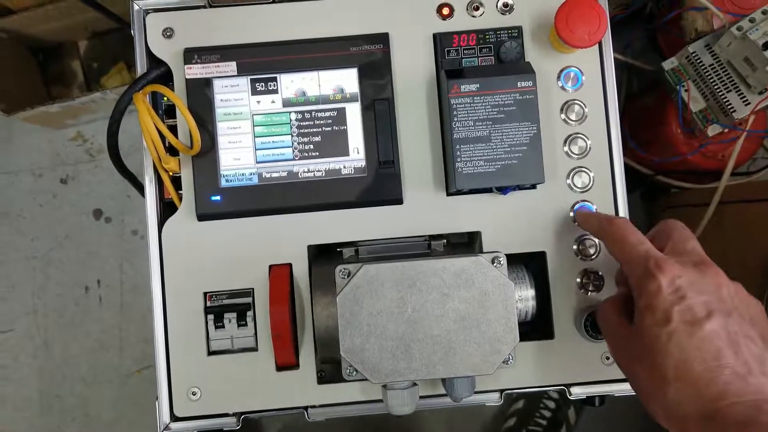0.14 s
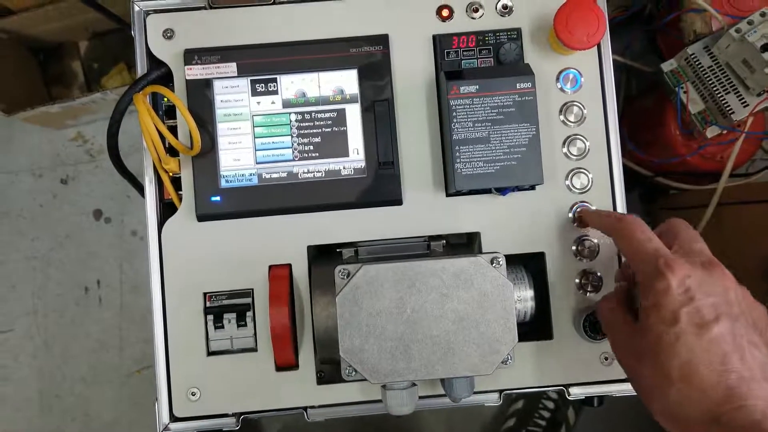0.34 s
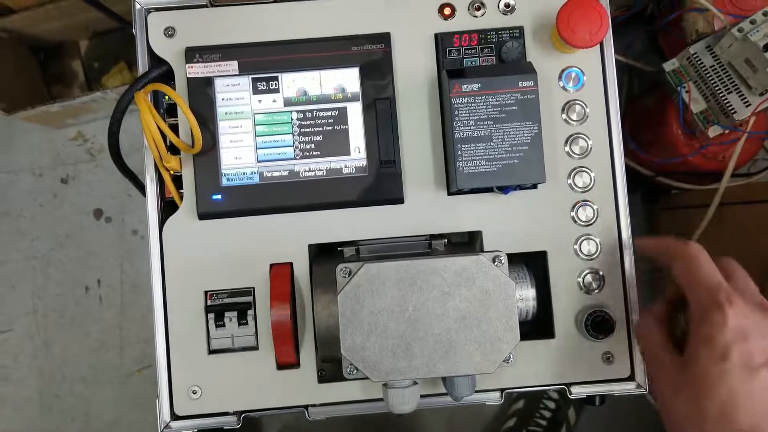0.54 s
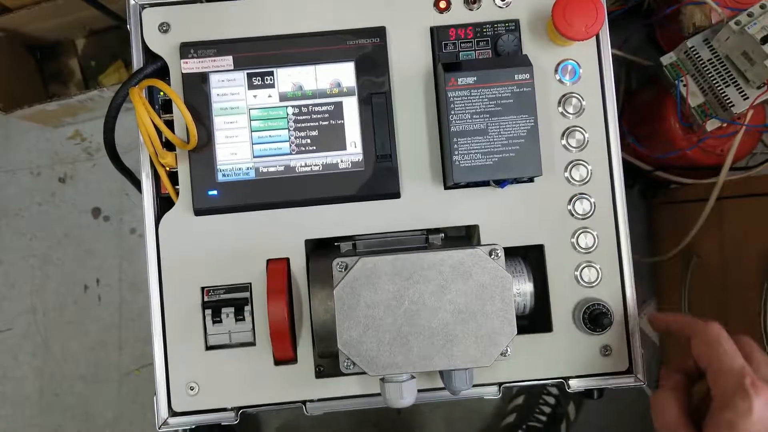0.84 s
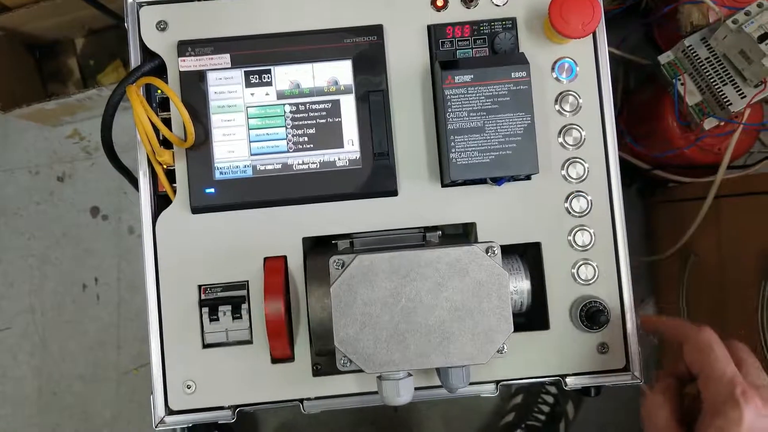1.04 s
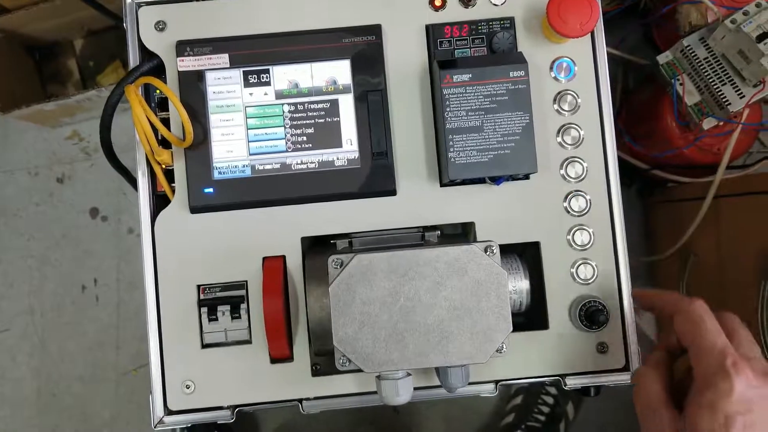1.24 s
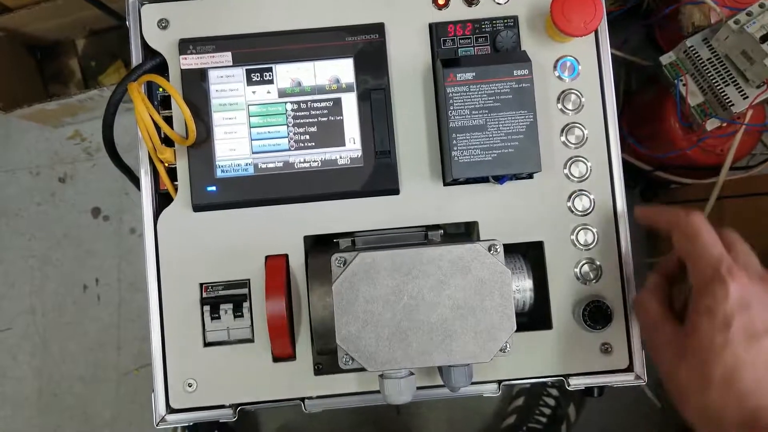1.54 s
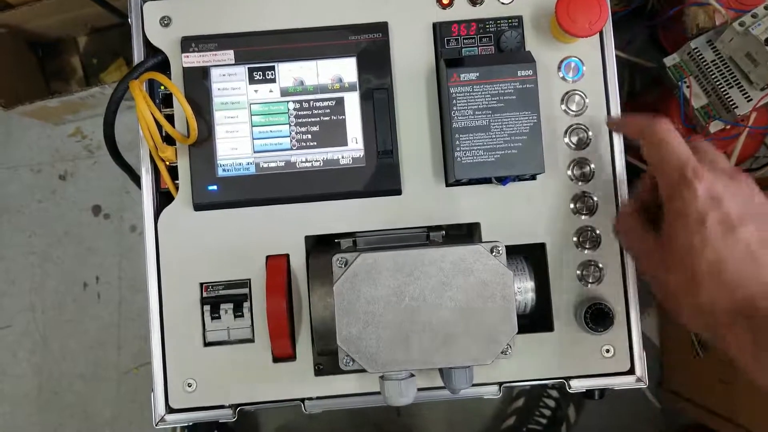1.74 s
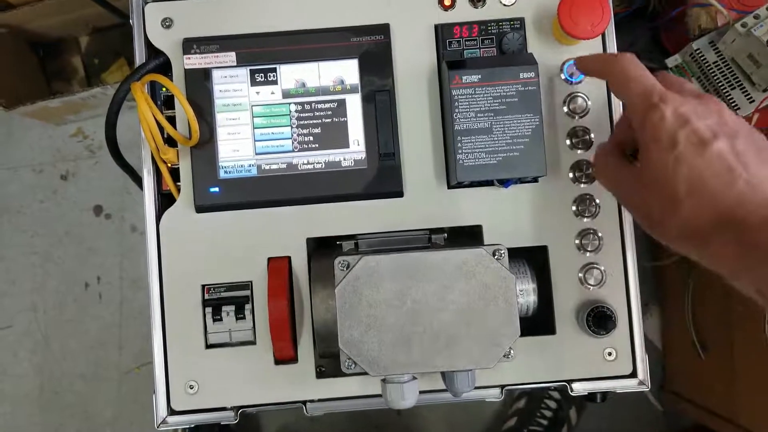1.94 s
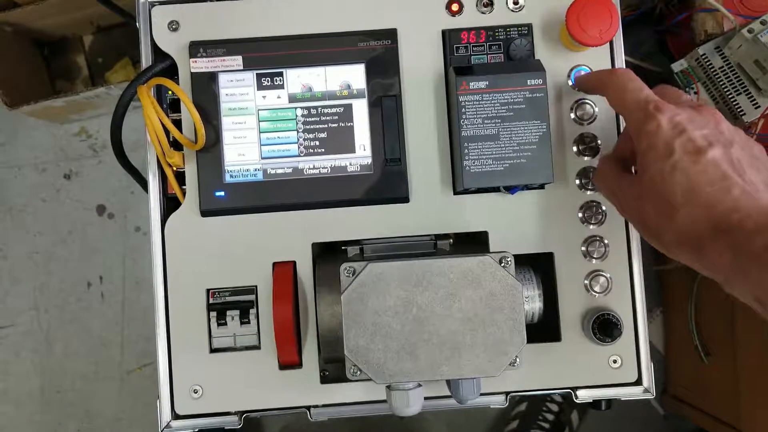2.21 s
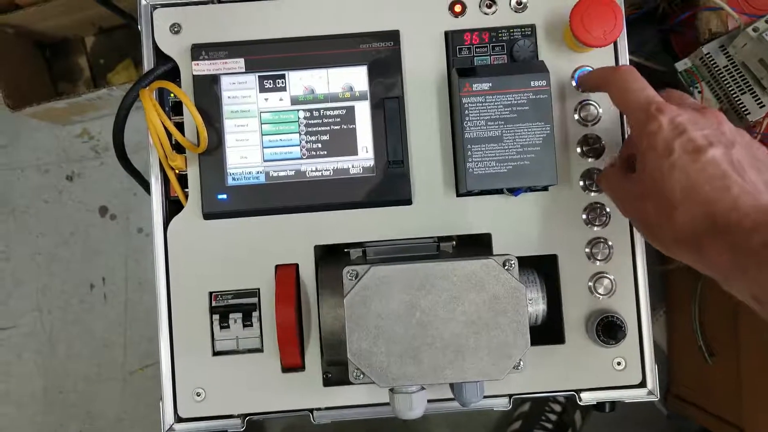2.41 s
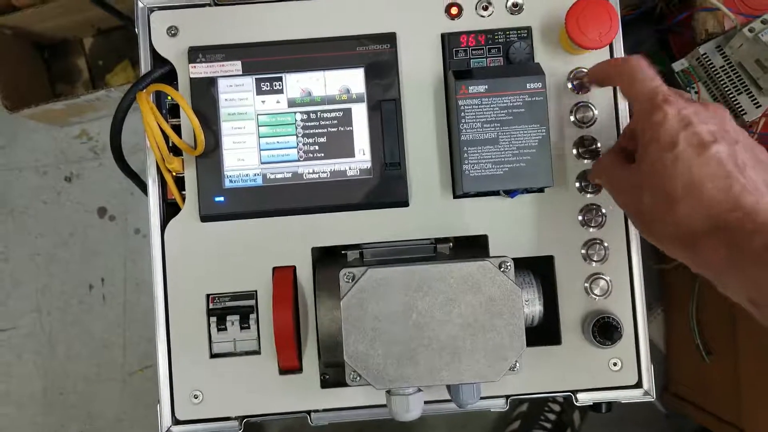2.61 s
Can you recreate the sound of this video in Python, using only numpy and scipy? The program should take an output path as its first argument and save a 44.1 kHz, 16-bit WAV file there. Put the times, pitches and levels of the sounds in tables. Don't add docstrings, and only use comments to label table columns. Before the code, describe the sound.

A small electric motor squeaks faintly while barely turning, then a button clicks, the hollow case thumps twice and the motor whines shrilly with fast rhythmic squeals until another click cuts it; close handheld phone, quiet room.

```python
import sys
import numpy as np
from scipy import signal
from scipy.fft import rfft, irfft
from scipy.io import wavfile
from scipy.ndimage import uniform_filter1d

SR = 44100
rng = np.random.default_rng(int(sys.argv[2]) if len(sys.argv) > 2 else 0)


def wav_record(signal):
    frames = np.transpose(np.atleast_2d(signal))
    bounded = np.clip(frames, -1, 1)
    quanta = np.round(bounded * 32767).astype(np.int16)
    wavfile.write(sys.argv[1], SR, quanta)


def natural_amplitude(level_db):
    exponent = np.asarray(level_db, float) / 20
    return 10 ** exponent


N = 123480
SHAFT_HZ = 16.02
ON_S, OFF_S, COAST_S = 0.222, 2.505, 0.03
FLICKER_DB = 1.5
PORTS = np.array([[1], [-1]])


def table(rows, hz):
    r = np.array(rows, float)
    return np.interp(np.log(hz + 1), np.log(r[:, 0]), r[:, 1])


def walk(rate):
    k = int(SR / rate)
    steps = np.repeat(rng.standard_normal(N // k + 1), k)
    return 1.53 * uniform_filter1d(uniform_filter1d(steps, k), k)[:N]


def swell(x, width):
    return np.exp(-.5 * (x / width) ** 2)


def pan(db):
    return natural_amplitude(PORTS * db / 2)


# f/Hz, level/dB
BALANCE = [(60, 4), (380, -11), (1500, -3), (4400, -10.5), (9000, -6.5), (15000, 4)]
# f/Hz, likeness (0 to 1)
LIKENESS_OF_PORTS = [(60, 0.81), (300, 0.8), (1200, 0.49), (3000, 0.2), (8000, 0.085), (16000, 0.039)]


def stereo(db_of):
    hz = np.arange(N // 2 + 1) * SR / N
    noise = rng.standard_normal((2, N))
    mid, side = rfft(noise)
    alike = np.clip(table(LIKENESS_OF_PORTS, hz), 0, 1)
    mixed = np.sqrt(1 + alike) * mid + PORTS * np.sqrt(1 - alike) * side
    out = irfft(mixed * natural_amplitude(db_of(hz)) * pan(table(BALANCE, hz)), N)
    return out / np.sqrt(np.sum(out ** 2) / np.sum(noise ** 2))


def tone(phase, pan_db, lead):
    return np.sqrt(2) * pan(pan_db) * np.sin(phase + PORTS * lead / 2)


# place in multiples of the drive frequency, level/dB, left-right/dB
SIDEBANDS = [(-13, -75, 6), (-11, -76, -3), (-7, -68, 2), (-5, -55, 10), (-1, -55, 4), (1, -52, 10),
             (5, -56, 4), (7, -69, 8), (11, -68, 3), (13, -68, 14), (17, -65, 10), (19, -67, 13),
             (23, -68, 3), (25, -72, 5), (29, -66, 7), (35, -72, 4)]
# f/Hz, level/dB
IDLE_LINES = [(9900, -84), (9970, -80), (9998, -74), (10099, -79)]
# t/s, level/dB
WHINE_NEARNESS = [(.3, -2), (.55, -2), (.62, 0), (1.1, 1), (1.25, -1), (1.75, 1), (1.95, -1.5), (2.2, -0.5),
                  (2.5, -4.5)]


def whine(t):
    carrier_hz, drive_hz = 10000.3, 32.41
    wander_db, wander_rad = 1.8, .5
    run = 0
    for multiple, db, pan_db in SIDEBANDS:
        hz = carrier_hz + round(multiple) * drive_hz
        level = natural_amplitude(db + wander_db * np.array([walk(5.4), walk(6.77)]))
        phase = 2 * np.pi * (hz * t + rng.random()) + wander_rad * walk(5.47)
        run = run + level * tone(phase, pan_db, -1.35 + 2 * wander_rad * walk(3.88))
    hum_phase = 2 * np.pi * 352.7 * t + 1.3 * walk(7.27)
    run = run + natural_amplitude(-64.5 + 1.6 * walk(10.55)) * tone(hum_phase, -8, -0.14)
    idle = 0
    for hz, db in IDLE_LINES:
        phase = 2 * np.pi * hz * t + 0.7 * walk(48)
        idle = idle + natural_amplitude(db + 1.1 * walk(30.7)) * tone(phase, 8.6, 0.88)
    rise_s, fall_s = 0.092, 0.0061
    on = np.clip((t - ON_S) / rise_s, 0, 1) * np.exp(-np.maximum(t - OFF_S, 0) / fall_s)
    near_db = np.interp(t, *np.array(WHINE_NEARNESS).T)
    return natural_amplitude(1.23 + near_db) * on * run + (1 - on) * idle


# f/Hz, peak level/dB, place in the turn, length in turns, glide share per turn
SQUEAL_PARTIALS = [(1193, -49, -0.015, 0.078, -0.077), (2455, -47, -0.012, 0.079, -0.122),
                   (2728, -51.5, -0.21, 0.086, -0.2256), (4832, -50.5, 0.065, 0.057, -0.011),
                   (5120, -54, 0.166, 0.017, 0.06), (6570, -52.5, -0.15, 0.11, -0.014),
                   (7270, -61, 0.051, 0.078, -0.062), (12170, -59, 0.087, 0.079, -0.026),
                   (3760, -64.5, -0.058, 0.14, -0.049), (5490, -65, -0.26, 0.086, 0.034)]
# left-right/dB, left leads/rad, roughness/rad
SQUEAL_PLACES = [(-1.5, 0.73, 0.57), (0.4, -1.44, 0.59), (1, -0.63, 1.37), (-11, -1.7, 0.59),
                 (-8.5, 1.5, 2.1), (4.5, 3, 0.76), (-12, -3, 0.5), (11, -0.6, 5.1), (-9.5, -2.5, 3.1),
                 (-8, 1, 3.5)]
# low hum level/dB, squeal level/dB, whistle level/dB, scrape level/dB
TURN_LEVELS = [(1, 0, 2, 3), (-4, 0.5, 1, 6), (0, 3.5, 1, 3.5), (-2.5, 6.5, -4, 2), (1, 5, -4, 2.5),
               (-2, 5, -2, 2), (-3, -2, 6.5, 2.5), (-1, 2, -8, -2), (-4, 1.5, 7.5, -0.5),
               (3.5, 3.5, 5.5, -4), (-4.5, 3, -4, 1.5), (-1.5, 0, 14, -2.5), (-0.5, 0, 0, -5),
               (4, -1, 1.5, 4), (1, -2.5, -4, -2), (3.5, 2.5, -7, 3.5), (-6, 5.5, -3, -6),
               (4.5, 5.5, -13, -8), (-0.5, 5, -1, -4), (-6, -12, 1, -5), (4, 0, 1, -0.5), (0.5, 3.5, 1, -2),
               (0.5, -23, 4, 1.5), (4, 1.5, -4, -6), (-2, 3.5, -7, -1), (0, -2.5, -2, -6),
               (2.5, -4, 5.5, -5), (-5, 3, -2, -1.5), (-4, -0.5, 6, 1.5), (3.5, 3, 2, 0.5),
               (1.5, -1.5, -4, -1.5), (3.5, -4.5, -5, -9), (1.5, 0, -3, 1), (-1, -11, 2, 4),
               (4, -11, 8.5, 2.5), (-1, -1.5, -7, -3), (-9, -4, 7.5, -2.5)]
PARTIAL_STRANDS = [(0, 1), (1, .55), (3, 1), (1, 1), (1, .7), (2, 1), (1, .5), (1, .4), (1, .4), (2, .5)]


def squeal(t):
    first_turn, last_turn_s = 5, 2.56
    jitter_turns, own_scatter_db = .012, 1
    turns = np.array(TURN_LEVELS, float)
    coast_db = np.maximum(t - last_turn_s, 0) / COAST_S * 20
    shared_jitter = rng.standard_normal(50)
    out = 0
    for partial, side, strand in zip(SQUEAL_PARTIALS, SQUEAL_PLACES, PARTIAL_STRANDS):
        hz, db, place, length, glide = partial
        pan_db, lead, rough = side
        column, share = strand
        turn = SHAFT_HZ * t - place + .5
        k = turn.astype(int)
        own_level, own_pitch, own_jitter = rng.standard_normal((3, 50))
        p = turn % 1 - .5 + jitter_turns * (shared_jitter[k] + own_jitter[k])
        shape = swell(p, length) + 0.24 * swell(p - 2 * length, 2 * length)
        turn_db = share * turns[np.clip(k - first_turn, 0, len(turns) - 1), int(column)]
        level_db = db + turn_db - coast_db + own_scatter_db * own_level[k] + FLICKER_DB * walk(250)
        pitch = hz * (1 + glide * p + 0.0037 * own_pitch[k])
        phase = 2 * np.pi * np.cumsum(pitch) / SR + rough * walk(200)
        out = out + shape * natural_amplitude(level_db) * tone(phase, pan_db, lead + 0.2 * rough * walk(60.3))
    return out * (t > ON_S + .05)


# f/Hz, level/dB per Hz
HISS_COLOUR = [(88, -47), (150, -15.5), (1190, -8), (4950, -16), (8400, -12.5), (10200, -3.5), (16000, -24)]
# f/Hz, width/Hz, level/dB
HOUSING_MODES = [(475.6, 116, 12.5), (208, 49, 10.5), (1180, 468, 14.5), (2627, 580, 9.5), (4820, 490, 2.5),
                 (6900, 1050, 5.5), (10000, 1700, -2), (12300, 1500, 5), (5900, 1100, 1.5)]


def hiss(t):
    def colour(hz):
        modes = sum(db / (1 + (2 * (hz - f) / width) ** 2) for f, width, db in HOUSING_MODES)
        return table(HISS_COLOUR, hz) + modes - 30 * (hz < 140)

    on = np.clip((t - ON_S) / 0.012, 0, 1) * np.exp(-np.maximum(t - OFF_S - .05, 0) / COAST_S)
    breath_db = 1.55 * np.cos(2 * np.pi * (SHAFT_HZ * t + 0.12))
    return natural_amplitude(-49.5 + breath_db + .8 * walk(24.89)) * on * stereo(colour)


# t/s, level/dB, push length/s, which ring
CASE_BLOWS = [(0.2424, -27, 0.00048, 0), (.244, -31.5, 0.00069, 0), (.247, -24, 0.00049, 0),
              (.251, -25.5, 0.00019, 0), (.288, -37, 0.0012, 1), (0.2993, -34, 0.00092, 1),
              (0.3019, -29, 0.001, 1), (0.317, -37.5, 0.00061, 1), (2.52, -39, 0.0011, 0),
              (2.529, -46.5, 0.0024, 1), (2.544, -48, 0.0035, 1), (2.566, -40, 0.0036, 1),
              (2.618, -51.5, 0.0021, 1)]
# f/Hz, level/dB, time to fall 60 dB/s
CASE_RINGS = [
    [(350.5, -3.5, 0.086), (461, -12.5, 0.29), (540.6, -4.5, 0.14), (710, -21.5, 0.11), (915, 2.5, 0.049),
     (1138, -1.5, 0.07), (1370, -20, 0.056)],
    [(209.5, -5.5, 0.16), (371.5, 4.5, 0.048), (464, 1.5, 0.15), (528, -2, 0.1), (790, -9, 0.0705),
     (1350, -13, 0.05)],
]


def case(t):
    low_cut_hz = 330, 170
    u = t[:SR // 3]
    out = np.zeros(N)
    for s, db, push, which in CASE_BLOWS:
        ring = 0
        for f, g, t60 in CASE_RINGS[int(which)]:
            ring = ring + natural_amplitude(g) * np.exp(-np.log(1000) * u / t60) * np.sin(2 * np.pi * f * u)
        i, n = int(s * SR), int(push * SR) + 3
        ring = np.convolve(ring, np.hanning(n) * 2 / n)[:min(len(u), N - i)]
        low_cut = signal.butter(6, low_cut_hz[int(which)], "high", fs=SR, output="sos")
        out[i:i + len(ring)] += natural_amplitude(db) * signal.sosfilt(low_cut, ring)
    return np.array([np.roll(out, 2), out]) * pan(-6.5)


# t/s, level/dB, scatter/s, tail/s
BUTTON_CLICKS = [
    (.2305, -31, 0.0048, 0.024),
    (2.5127, -30.5, 0.005, 0.03),
]
# f/Hz, level/dB
CLICK_COLOUR = [(880, -34), (1500, -21), (3030, -15.5), (4590, -10.5), (9000, -12.5), (14600, -20),
                (16000, -20)]


def clicks(t):
    env = 0
    for s, db, scatter, tail in BUTTON_CLICKS:
        flurry = np.exp(-((t - s - scatter / 2) / scatter) ** 4)
        env = env + natural_amplitude(db) * (t > s) * (flurry + 0.31 * np.exp(-np.maximum(t - s, 0) / tail))
    return env * natural_amplitude(walk(3000)) * stereo(lambda hz: table(CLICK_COLOUR, hz))


# t/s, level/dB, length/s, whistle level/dB, low groan level/dB
CREEP_SQUEAKS = [
    (.008, -58.5, 0.009, -11, -11),
    (.028, -65, .008, 1, -18),
    (0.056, -68.5, 0.012, -7, -5),
    (.075, -73, 0.0099, -18, 1),
    (0.096, -75, .012, -20, 13.5),
    (0.132, -76.5, 0.017, -20, 8.5),
    (0.162, -66, 0.0042, -9, -2),
    (0.181, -57.5, 0.008, 7, -12),
    (.21, -60, 0.0083, -20, -17),
    (0.222, -61, .004, -8, -10),
]
# f/Hz, level/dB
SQUEAK_TONES = [(2415, 1), (4860, -2), (3990, -23), (12100, -5.5)]


def creep(t):
    def rough(hz):
        phase = 2 * np.pi * hz * t + 1.5 * walk(144.8)
        return natural_amplitude(FLICKER_DB * walk(111)) * tone(phase, -8.5, -1.46)

    rub = natural_amplitude(-2) * stereo(lambda hz: -10 * np.abs(np.log2((hz + 1) / 3500)))
    body = rub + sum(natural_amplitude(db) * rough(hz) for hz, db in SQUEAK_TONES)
    whistle, groan = rough(7090), rough(1205)
    out = 0
    for s, db, length, whistle_db, groan_db in CREEP_SQUEAKS:
        sound = body + natural_amplitude(whistle_db) * whistle + natural_amplitude(groan_db) * groan
        out = out + natural_amplitude(db) * swell(t - s, length) * sound
    return out


def rundown(t):
    cut_hz, rest_hz, rub_db, fade_s = 2500, 2150, -60, .05
    hum_hz, hum_db = 200, -69
    u = np.maximum(t - OFF_S - .04, 0)
    hz = rest_hz + (cut_hz - rest_hz) * np.exp(-u / 0.073)
    rub_phase = 2 * np.pi * np.cumsum(hz) / SR + 3.1 * walk(250)
    rub = natural_amplitude(rub_db + 3 * walk(90)) * np.exp(-u / fade_s) * tone(rub_phase, 0, -0.74)
    hum_phase = 2 * np.pi * hum_hz * t + 1.7 * walk(30)
    hum = natural_amplitude(hum_db + 1.4 * walk(24.86)) * tone(hum_phase, -7.5, 0)
    return np.clip(u / 0.022, 0, 1) * (rub + hum)


# t/s, level/dB, f/Hz
LOOSE_TICKS = [
    (2.343, -47, 5600),
    (.507, -55, 12000),
]


def ticks(t):
    out = 0
    for s, db, hz in LOOSE_TICKS:
        env = natural_amplitude(db) * (t > s) * np.exp(-np.maximum(t - s, 0) / .004)
        out = out + env * stereo(lambda f: -22 * np.abs(np.log2((f + 1) / hz)))
    return out


# t/s, level/dB, length/s
FINGER_BUMPS = [(0.312, -58, 0.055), (0.63, -61.5, 0.04), (0.794, -50.5, 0.015), (0.893, -54.5, 0.029),
                (1.023, -62, 0.029), (1.109, -51, 0.012), (1.177, -56, 0.033), (1.554, -62, 0.051),
                (2.292, -72, 0.02), (2.45, -55.5, 0.014), (2.539, -52, 0.017), (2.602, -56, 0.016)]


def rumble(t):
    colour = [(20, -7.5), (55, 4.0), (85, -2.5), (130, -14), (400, -61)]  # f/Hz, level/dB
    env = natural_amplitude(-67) + sum(natural_amplitude(db) * swell(t - s, length) for s, db, length in FINGER_BUMPS)
    return env * stereo(lambda hz: table(colour, hz)) * pan(-9)


# f/Hz, level/dB per Hz
ROOM_COLOUR = [(60, -11), (130, -8), (220, -3), (480, -5.5), (1250, -11.5), (2200, -12), (4000, -25.5),
               (16000, -16)]


def room():
    return natural_amplitude(-63.5 + .8 * walk(5.6)) * stereo(lambda hz: table(ROOM_COLOUR, hz) - 20 * (hz < 100))


def scene():
    t = np.arange(N) / SR
    motor = whine(t) + squeal(t) + hiss(t) + creep(t) + rundown(t)
    knocks = case(t) + clicks(t) + ticks(t)
    return motor + knocks + rumble(t) + room()


def low_pass(x):
    return signal.sosfilt(signal.butter(12, 16970, fs=SR, output="sos"), x)


# f/Hz, width/Hz, level/dB
MIC_DIPS = [(3147, 365, -15), (8330, 1700, -9.5), (1770, 315, -5)]


def record(dry):
    hz = np.arange(N // 2 + 1) * SR / N
    dips = sum(db * np.exp(-(2 * (hz - f) / width) ** 2) for f, width, db in MIC_DIPS)
    top_loss = np.maximum(hz - 15800, 0) / 8
    mix = irfft(rfft(dry) * natural_amplitude(dips - top_loss), N)
    return low_pass(mix)


dry = scene()
out = record(dry)
wav_record(out)
```